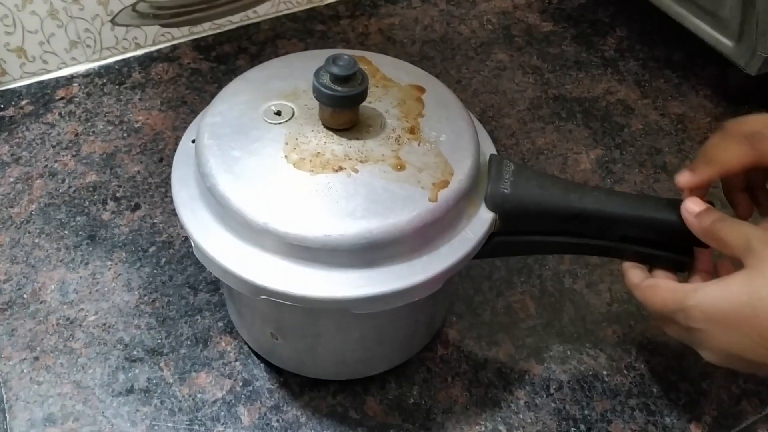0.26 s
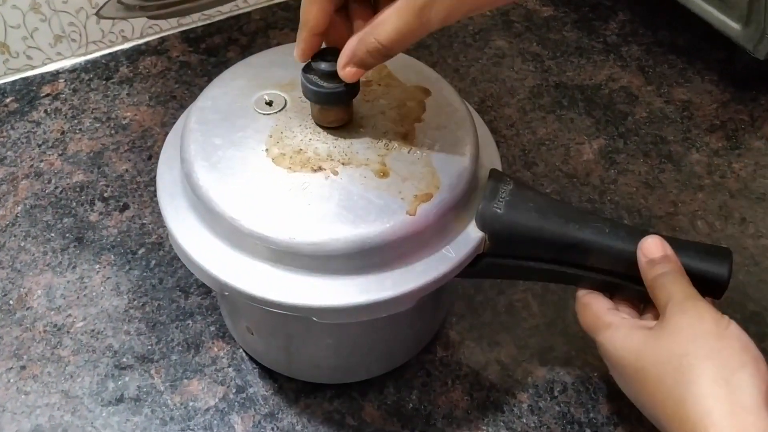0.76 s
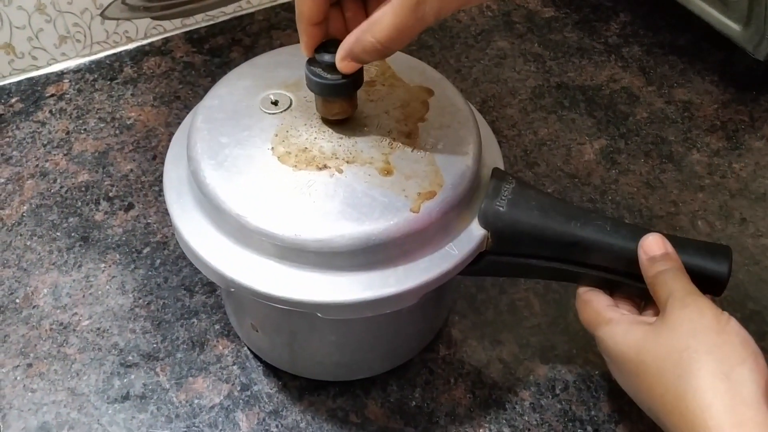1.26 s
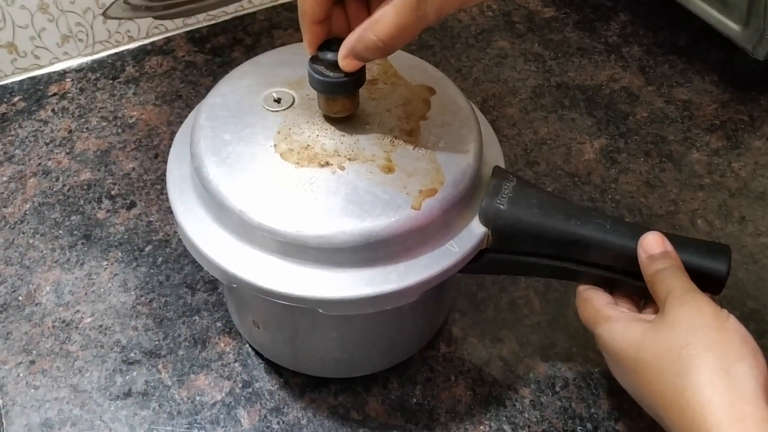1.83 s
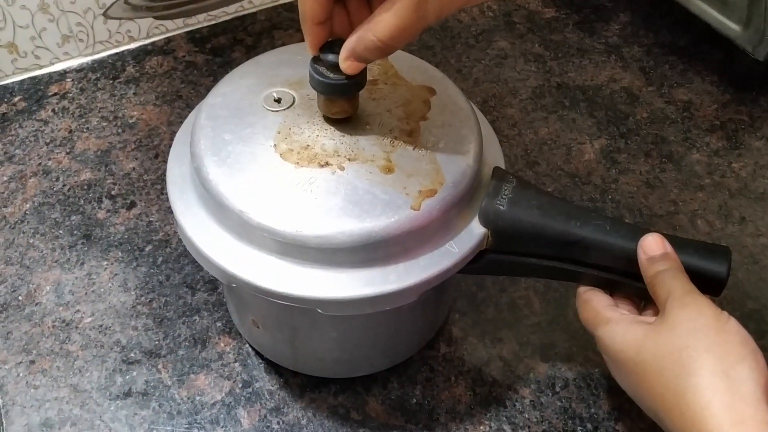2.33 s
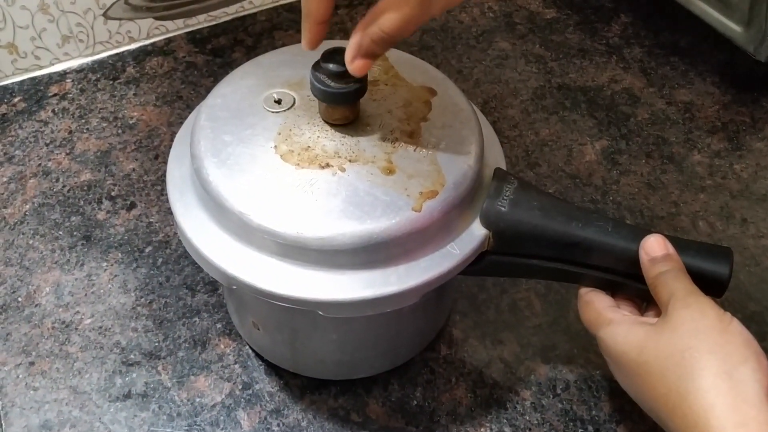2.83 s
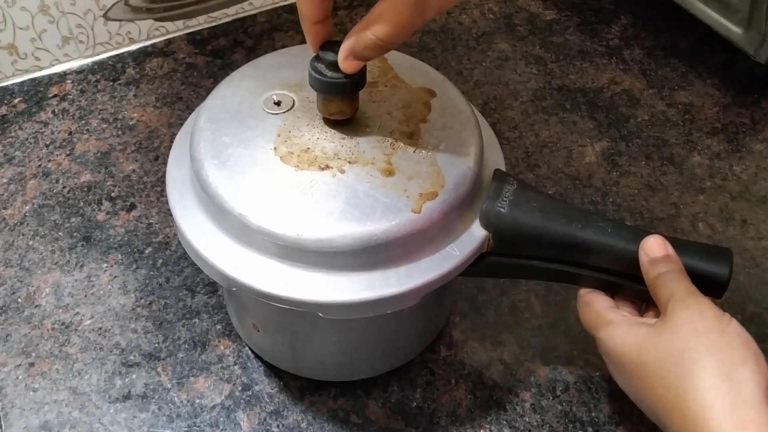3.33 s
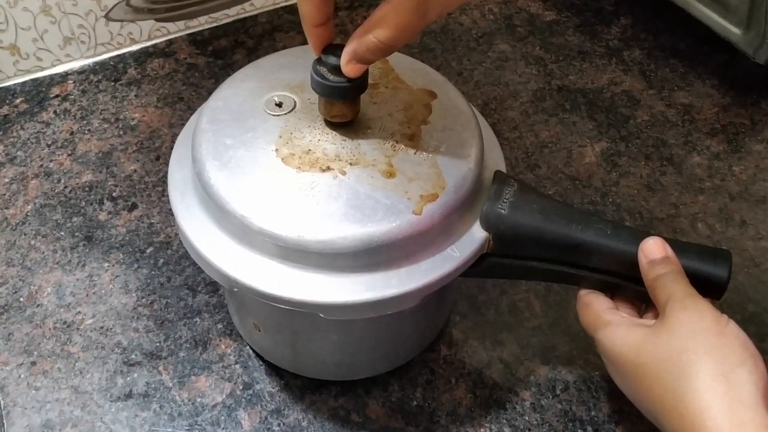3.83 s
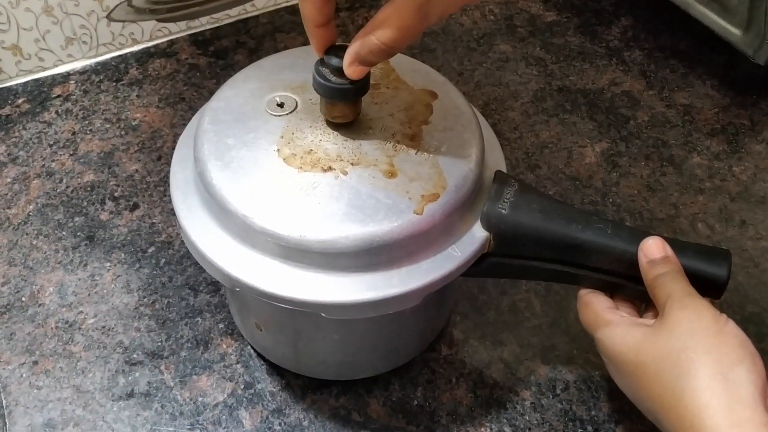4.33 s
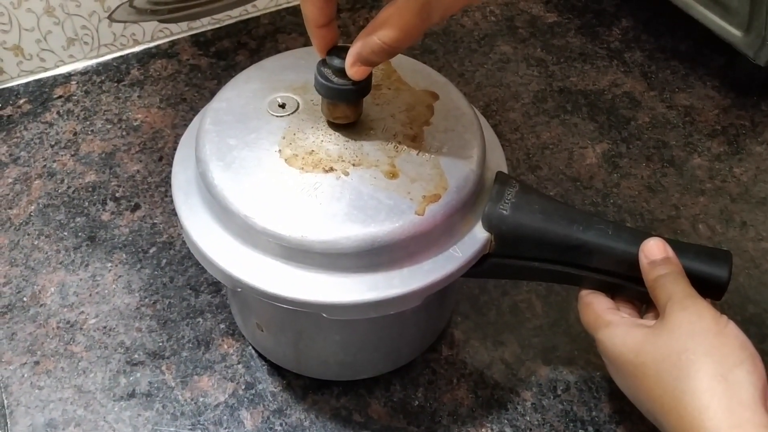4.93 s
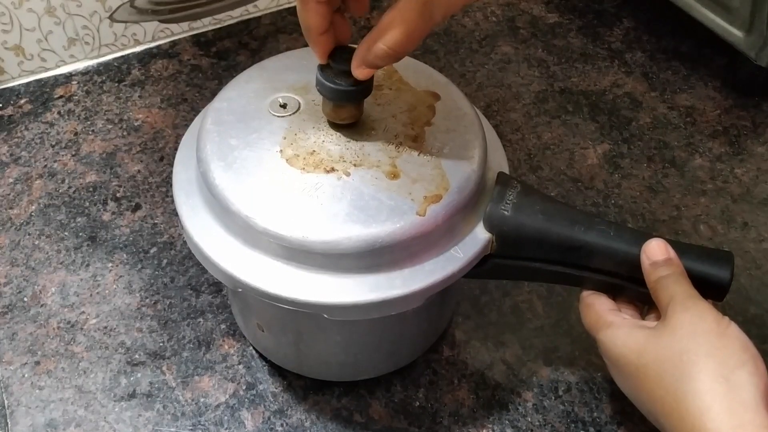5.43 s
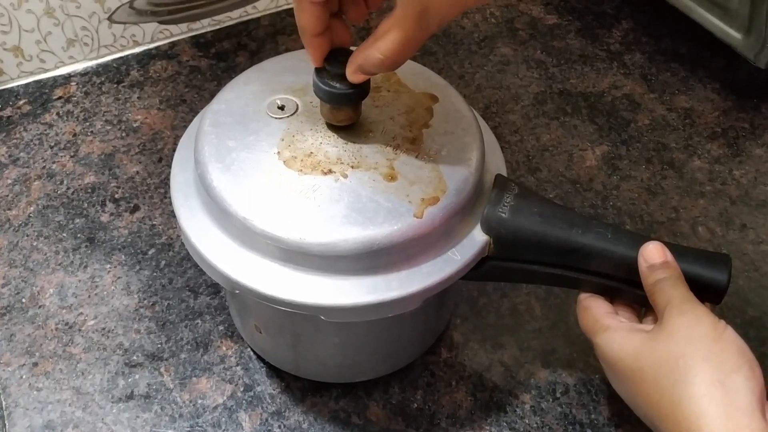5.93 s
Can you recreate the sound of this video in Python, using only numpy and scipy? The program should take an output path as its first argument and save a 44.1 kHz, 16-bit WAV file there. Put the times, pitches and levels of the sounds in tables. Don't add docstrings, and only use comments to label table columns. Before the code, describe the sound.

Close handheld microphone in a quiet kitchen with low rumble and faint appliance drone. A thin seep comes first, then a metal weight lifts with a click and steam bursts out, bright and harsh, over a faint sinking moan. The hiss fades until the weight clanks onto the lid. After a short near-silence, a softer second hiss starts and dies away with small swells.

```python
import sys
import numpy as np
from scipy import signal
from scipy.fft import rfft, irfft, next_fast_len
from scipy.io import wavfile
from scipy.ndimage import uniform_filter1d

SR = 44100
rng = np.random.default_rng(int(sys.argv[2]) if len(sys.argv) > 2 else 0)


def wav_out(sig):
    wavfile.write(sys.argv[1], SR, np.round(np.clip(np.atleast_2d(sig).T, -1, 1) * 32767).astype(np.int16))


def gain_from_db(level_db):
    decades = np.asarray(level_db, float) / 20
    return 10 ** decades


N = 272097

# time in seconds, jet level in dB.
LIFT_FLOW = [
    [(0.96, -87.5), (0.996, -35.5), (1.014, -27), (1.032, -26), (1.176, -27), (1.32, -29.5), (2.504, -44.5),
     (2.546, -47.5), (2.578, -56)],
    [(3.1, -91), (3.11, -54.5), (3.13, -38.5), (3.17, -34), (3.41, -40.5), (3.6, -42.5), (4.14, -52),
     (5.05, -58.5), (6.17, -64)],
]
# peak in seconds, extra level in dB, rise and fall in seconds.
NUDGES = [
    (3.52, 1.5, 0.11, .08),
    (5.12, 3, .03, 0.045),
    (5.31, 7, 0.24, 0.075),
    (5.63, 3, .03, 0.66),
    (6.05, 3, .008, 0.14),
]
# jet level in dB, then fizz, whistle, rush and roar relative to the jet in dB.
FLOW_COLOUR = [(-63.5, -8.5, -8.5, -4.5, -11), (-50, -14.5, -14, -11, -17.5), (-39, -13, -16.5, -15, -19),
               (-30, -14.5, -14.5, -16, -20.5), (-25.5, -13, -9, -14, -23.5)]
# change of fizz, whistle, rush and roar in dB.
NARROW_GAP_DB = (6.5, -6.5, 6.5, 0)
# change of fizz, whistle, rush and roar in dB.
SEAT_DB = [
    (1.5, 1.3, 0.43, 0.26),
    (-2.5, -1.4, -1.64, -0.26),
]
# frequency in Hz, width in Hz, level in dB.
CAVITIES = [(7440, 400, -7.5), (8696, 1540, 1), (10730, 600, -2), (11640, 600, -1), (12510, 1480, 2)]
# frequency in Hz, level in dB.
JET_SHAPE = [(5000, -36), (7000, -28), (9500, -5), (11300, -6), (13500, -5.5), (14500, -12), (15700, -22)]
# frequency in Hz, level in dB.
FIZZ_SHAPE = [(12800, -49), (13800, -4), (14700, -5), (15450, -1.5), (15800, -6.5)]
# frequency in Hz, width in Hz, level in dB.
VENT_WHISTLE = [(3574, 290, -5), (3326, 624, -4.5), (3600, 200, -8)]
# frequency in Hz, density in dB per Hz.
RUSH_SHAPE = [(2350, -29), (4000, -3), (4200, -1.5), (6030, 0.5), (6460, -1.5), (7200, -3), (9360, -21.5),
              (15800, -120)]
# frequency in Hz, density in dB per Hz.
ROAR_SHAPE = [(300, -21.5), (500, -11.5), (700, -15.5), (880, -10.5), (1380, -1), (1700, -6), (2300, -2),
              (2440, 5), (2580, -5.5), (3000, -12.5), (3600, -27.5)]
# frequency in Hz, width in Hz, level in dB.
HOLLOWS = [(545, 50, 0), (410, 45, 0), (322, 30, 0), (249, 12, 4), (350, 600, -9)]
# start in seconds, peak in dB, pot thump in dB, tilt in dB per octave,
# most excited frequency in Hz.
KNOCKS = [
    (0.071, -60, -70, -6, 2450),
    (1.011, -33.5, -57.5, 6, 620),
    (2.473, -39, -70, 3, 1570),
    (2.549, -44, -49.5, -9, 620),
    (2.587, -28.5, -43, 1, 1107),
    (2.974, -70, -81.5, 13.5, 8000),
    (3.049, -49, -70, -5.5, 400),
    (3.108, -44, -73, -4, 1410),
    (6.045, -74, -82, 7, 10500),
]
# frequency in Hz, level in dB, 60 dB decay in seconds.
LID_MODES = [(620, -17, 0.048), (792, -13, 0.16), (1110, -9, 0.039), (1383, -2, 0.041), (1570, -6, 0.045),
             (1780, 2.5, 0.057), (1890, -16, 0.7), (1950, -17.5, 0.46), (2227, -5.5, 0.09),
             (2450, -3.5, 0.073), (2660, -20, 0.043), (3180, -21, 0.026), (3660, -12, 0.025),
             (4480, -10.5, 0.052), (6045, -12, 0.024), (7650, -16.5, .02), (10500, -10.5, .02)]
# frequency in Hz, level in dB, 60 dB decay in seconds.
POT_MODES = [(235, 4, 0.55), (130, -13.5, 0.052), (169, -10, 0.11), (301, -13, .08), (417, -14.5, .06)]
# start in seconds, level in dB,
# frequency in Hz, swell in cycles.
PUFFS = [(1.004, -53, 280, 2.5), (2.575, -47, 390, 2.2), (3.152, -42.5, 210, 0.8),
         (2.587, -38.5, 4760, 7.5), (2.586, -50, 3500, 5.1), (2.587, -51, 6200, 8.5),
         (2.586, -37.5, 1048, 4.7), (2.594, -42, 1080, 5.3), (2.595, -41, 2000, 8), (2.629, -49, 1850, 14),
         (2.668, -57, 1000, 6), (2.472, -47, 1580, 29), (2.472, -47, 2500, 18), (0.049, -69, 2420, 60)]
# start and end in seconds, frequency in Hz, width in Hz, level in dB.
SQUEAKS = [
    (4.35, 5.3, 4510, 40, -72),
    (4.4, 5.3, 5170, 35, -73),
    (5.45, 6.17, 7350, 140, -73.5),
    (5.1, 5.9, 12000, 60, -73),
    (2.9, 3.06, 2870, 140, -79.5),
    (2.64, 2.79, 1880, 90, -72),
    (2.93, 2.8, 1370, 140, -81),
    (2.72, 2.92, 800, 250, -78),
    (4.3, 5.3, 5100, 1500, -66.5),
]
# delay in seconds, level in dB.
ECHOES = [(.0031, -29), (.0057, -31), (.0092, -18)]
# frequency in Hz, 60 dB decay in seconds.
ROOM_DECAY = [(300, 0.31), (2000, 0.23), (10000, 0.21)]
# frequency in Hz, density in dB per Hz.
RUMBLE_SHAPE = [(24, -36), (40, -8), (91, 0), (151, -19.5), (183, 3), (209, -23), (230, -5.5), (333, -4.5),
                (358, -2.5), (389, -7.5), (483, -9.5), (519, -14), (700, -33.5), (910, -47), (1540, -120)]
# frequency in Hz, density in dB per Hz.
AIR_SHAPE = [(350, -31.5), (600, -10), (941, -14.5), (1440, -20.5), (2760, -21), (3390, -24), (4220, -25.5),
             (15600, -27)]
# frequency in Hz, width in Hz, level in dB.
DRONE = [(48.8, 14, -79), (103, 20, -69), (183.1, 14, -73.5), (361, 26, -77.5)]
# frequency in Hz, level in dB.
SWAY_SHAPE = [(4, -12.5), (11, -15), (17, 2.5), (22, -9.5), (27, -22.5), (33, -29), (45, -19.5), (80, -34),
              (150, -64.5)]


def evened(x):
    return x / np.sqrt(np.mean(x ** 2) + 1e-20)


def read(points, hz):
    f, value = np.transpose(points)
    return np.interp(np.log(hz + 1), np.log(f + 1), value)


def humps(peaks, hz):
    return np.sqrt(sum(gain_from_db(db) ** 2 / (1 + (2 * (hz - f) / width) ** 2) ** 2 for f, width, db in peaks))


def coloured(x, shape):
    size = next_fast_len(N)
    spectrum = rfft(x, size) * shape(np.fft.rfftfreq(size, 1 / SR))
    return evened(irfft(spectrum, size)[:N])


def resonate(x, hz, width):
    turn = np.exp(2j * np.pi * np.cumsum(hz * np.ones(len(x))) / SR)
    r = np.exp(-np.pi * width / SR)
    return 2 * (turn * signal.lfilter([1 - r], [1, -r], x / turn)).real


def turbulence(patchy_db, flicker_db, gust_db, spit_db):
    frames = N // 64 + 8
    a, b, patches = rng.standard_normal((frames, 129, 3)).T
    patches = uniform_filter1d(patches, size=4, axis=0)
    patches = evened(uniform_filter1d(patches, size=40, axis=1))
    flicker, gusts = rng.standard_normal((frames, 2)).T
    flicker = evened(uniform_filter1d(flicker, size=3))
    gusts = evened(uniform_filter1d(gusts, size=50) - uniform_filter1d(gusts, size=160))
    z = (a + 1j * b) * gain_from_db(patchy_db * patches + flicker_db * flicker + gust_db * gusts)
    hiss = evened(signal.istft(z, nperseg=256, noverlap=192)[1][:N])
    hits = rng.random(N) < 400 / SR
    drops = hits * np.minimum(rng.exponential(1, N), 2.5) * rng.choice([-1, 1], N)
    return hiss + gain_from_db(spit_db) * evened(drops)


def steam():
    opening_s, closing_s, shut_db_per_s = 0.067, 0.27, 500
    t, out = np.arange(N) / SR, np.zeros(N)
    eddies = turbulence(patchy_db=1.08, flicker_db=0.45, gust_db=0.19, spit_db=-24)
    jet = coloured(eddies, lambda hz: np.hypot(gain_from_db(read(JET_SHAPE, hz)), humps(CAVITIES, hz)))
    fizz = coloured(eddies, lambda hz: gain_from_db(read(FIZZ_SHAPE, hz)))
    whistle = coloured(eddies, lambda hz: humps(VENT_WHISTLE, hz))
    rush = coloured(eddies, lambda hz: gain_from_db(read(RUSH_SHAPE, hz)))
    roar = coloured(eddies, lambda hz: gain_from_db(read(ROAR_SHAPE, hz)))

    nudge_db = np.zeros(N)
    for s, db, rise, fall in NUDGES:
        nudge_db += db * np.clip(np.minimum(1 + (t - s) / rise, 1 - (t - s) / fall), 0, 1)

    flow_db, *laws = np.transpose(FLOW_COLOUR)
    for rows, seat_db, seats in zip(LIFT_FLOW, SEAT_DB, (True, False)):
        s, level_db = np.transpose(rows)
        jet_db = np.interp(t, s, level_db, left=-140) + nudge_db
        narrow = np.clip(1 - (t - s[1]) / opening_s, 0, 1)
        if seats:
            narrow += np.clip(1 + (t - s[-1]) / closing_s, 0, 1)
        shut_db = shut_db_per_s * np.maximum(t - s[-1], 0)
        out += jet * gain_from_db(jet_db - shut_db)
        for layer, law, gap, seat in zip((fizz, whistle, rush, roar), laws, NARROW_GAP_DB, seat_db):
            layer_db = np.interp(jet_db, flow_db, law) + gap * narrow + seat
            out += layer * gain_from_db(jet_db + layer_db - shut_db)
    return out


def moan():
    start_s, end_s, rise_s = 1.0, 2.62, 0.26
    first_hz, last_hz, sag_s = 628, 145, 0.79
    age = np.arange(N) / SR - start_s
    on = (age > 0) * (age < end_s - start_s) * np.clip(age / rise_s, 0, 1)
    pitch = last_hz + (first_hz - last_hz) * np.exp(-np.maximum(age, 0) / sag_s)
    tone = resonate(resonate(rng.standard_normal(N), pitch, 150), pitch, 150) * on
    growth_db = 2 * np.clip(age, 0, 2)
    return coloured(tone, lambda hz: humps(HOLLOWS, hz)) * gain_from_db(-70 + growth_db)


def ring(modes, t, tilt_db, damping, most_hz):
    out = np.zeros(len(t))
    for hz, db, t60 in modes:
        favour_db = 11 / (1 + (np.log2(hz / most_hz) / 0.056) ** 2)
        level_db = db + tilt_db * np.log2(hz / 2000) + favour_db - 60 * damping * t / t60
        out += gain_from_db(level_db) * np.sin(2 * np.pi * hz * t)
    return out


def knocks():
    base_damping, seated_db, seated_damping = 1.87, -35.5, 0.27
    t, out = np.arange(SR // 2) / SR, np.zeros(N + SR)
    for s, peak_db, thump_db, tilt_db, most_hz in KNOCKS:
        damping = base_damping + seated_damping * max(peak_db - seated_db, 0)
        crack, chatter = rng.standard_normal((len(t), 2)).T
        chatter = gain_from_db(-21) * chatter * np.exp(-t / 0.026)
        chatter[0] = 1
        lid = ring(LID_MODES, t, tilt_db, np.clip(damping, 0.3, 5), most_hz)
        lid = signal.fftconvolve(chatter, lid)[:len(t)]
        lid = lid / abs(lid).max() + gain_from_db(-16 + 1.86 * tilt_db) * crack * np.exp(-t / 0.0017)
        pot = ring(POT_MODES, t, 0, 1.45 * base_damping, most_hz) * (1 - np.exp(-t / 0.005))
        out[round(s * SR):][:len(t)] += gain_from_db(peak_db) * lid + gain_from_db(thump_db) * pot
    return out[:N]


def puffs():
    out = np.zeros(N)
    for s, db, hz, cycles in PUFFS:
        turns = np.arange(0, 4 * cycles, hz / SR)
        swell = turns / cycles * np.exp(1 - 2 * turns / cycles) * 2
        out[round(s * SR):][:len(turns)] += gain_from_db(db) * swell * np.sin(2 * np.pi * turns)
    return out


def leaks():
    t, noise = np.arange(N) / SR, rng.standard_normal(N)
    seep = coloured(noise, lambda hz: hz ** 2 / (hz ** 2 + 1800 ** 2))
    out = seep * gain_from_db(-65 - 4.5 * t) * (t < 0.96)
    for start, end, hz, width, db in SQUEAKS:
        swell = np.sin(np.pi * np.clip((t - start) / (end - start), 0, 1)) ** 0.5
        out += gain_from_db(db) * swell * evened(resonate(noise, hz, width))
    return out


def room(x):
    taps = np.zeros(SR // 2)
    at = np.arange(400, len(taps) - 20, 20)
    taps[at + rng.integers(0, 20, len(at))] = rng.choice([-1., 1.], len(at))
    hz, t, z = signal.stft(taps, SR, nperseg=256)
    fade_db = -60 * t / read(ROOM_DECAY, hz)[:, None]
    tail = signal.istft(z * gain_from_db(fade_db), SR, nperseg=256)[1]
    answer = gain_from_db(-10.5) * tail / np.linalg.norm(tail)
    answer[0] = 1
    for s, db in ECHOES:
        answer[round(s * SR)] += gain_from_db(db)
    return signal.oaconvolve(x, answer / np.linalg.norm(answer))[:N]


def kitchen():
    rumble, air, sway = rng.standard_normal((3, N))
    rumble = gain_from_db(-64) * coloured(rumble, lambda hz: gain_from_db(read(RUMBLE_SHAPE, hz)))
    air = gain_from_db(-72) * coloured(air, lambda hz: gain_from_db(read(AIR_SHAPE, hz)))
    sway = coloured(sway, lambda hz: gain_from_db(read(SWAY_SHAPE, hz)))
    age = np.arange(N) / SR / 0.16
    settle_db = 8 * age * np.exp(1 - age)
    sway = gain_from_db(-60 + settle_db) * sway
    sway += 0.54 * (gain_from_db(settle_db) - 1) * resonate(rumble, 60, 72)
    lines = sum(gain_from_db(db) * evened(resonate(rng.standard_normal(N), hz, width)) for hz, width, db in DRONE)
    return rumble + air + lines + sway


def scene():
    at_pot = steam() + moan() + knocks() + puffs()
    return np.tile(room(at_pot) + leaks() + kitchen(), (2, 1))


def roll_off(x):
    return signal.sosfilt(signal.butter(12, 15770, fs=SR, output="sos"), x)


def record(dry):
    edge = signal.firwin(1023, 15730, window=("kaiser", 8), fs=SR)
    mix = signal.oaconvolve(dry, edge[None], "same")
    return roll_off(mix)


dry = scene()
out = record(dry)
wav_out(out)
```